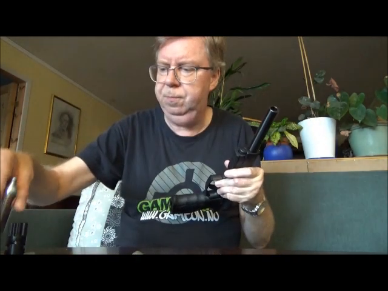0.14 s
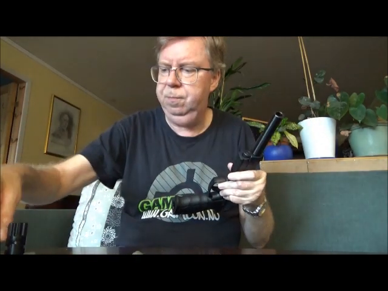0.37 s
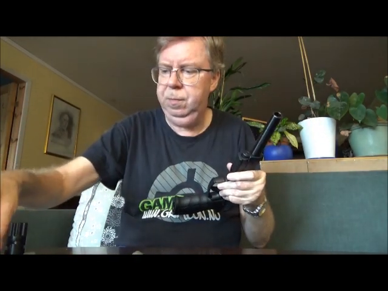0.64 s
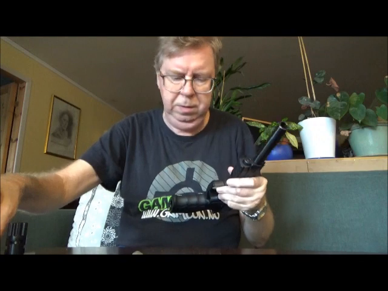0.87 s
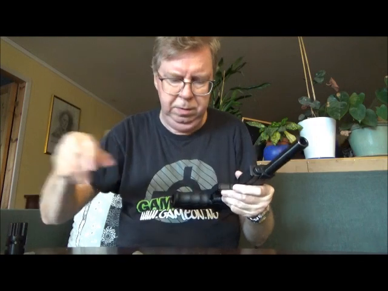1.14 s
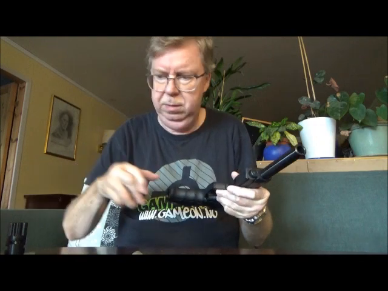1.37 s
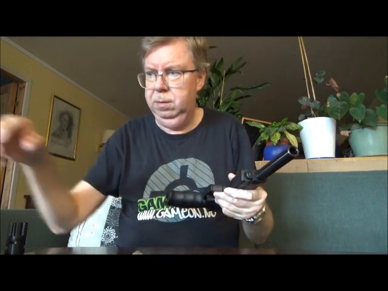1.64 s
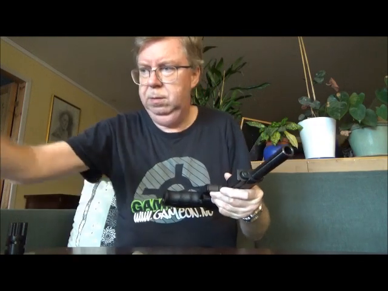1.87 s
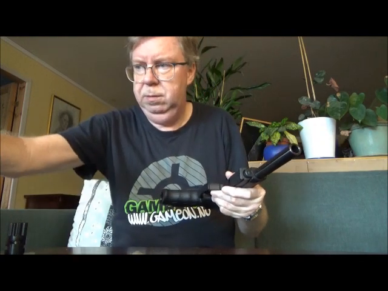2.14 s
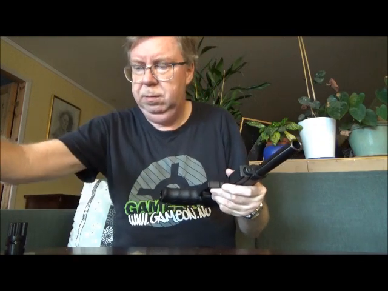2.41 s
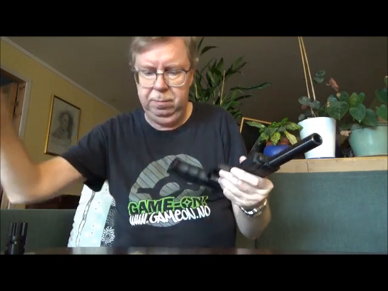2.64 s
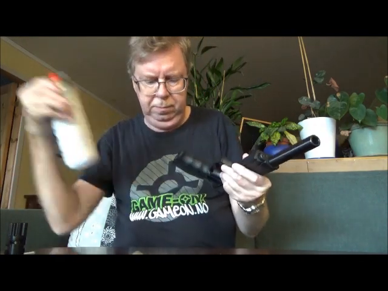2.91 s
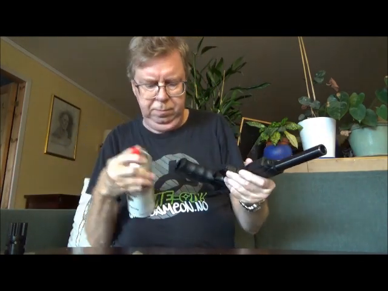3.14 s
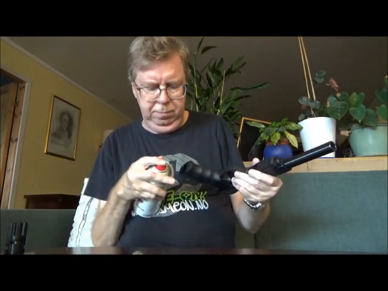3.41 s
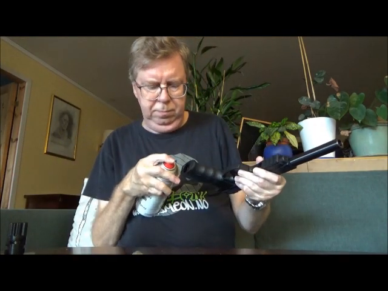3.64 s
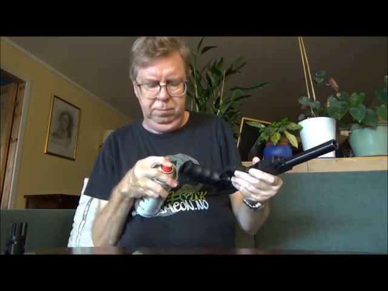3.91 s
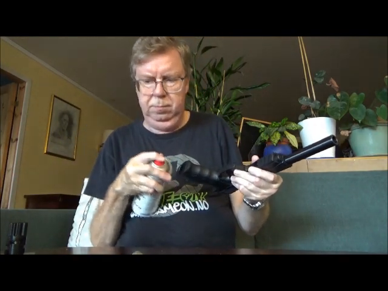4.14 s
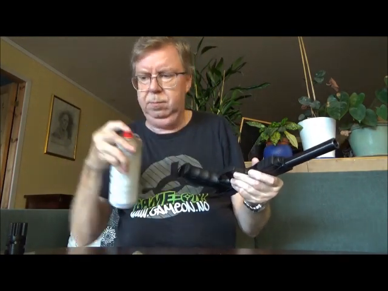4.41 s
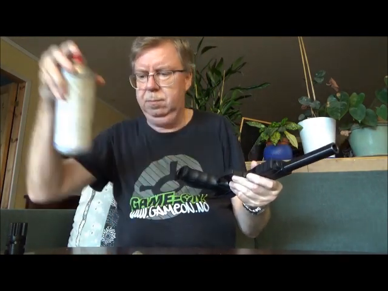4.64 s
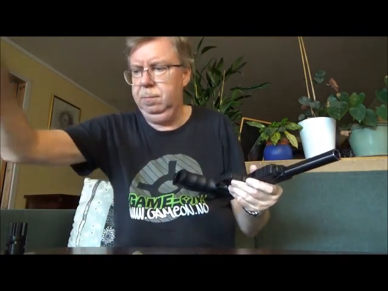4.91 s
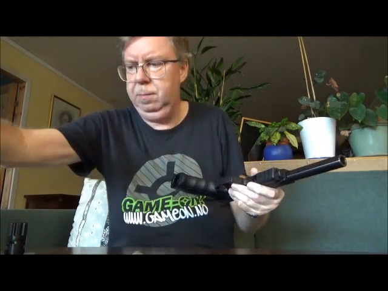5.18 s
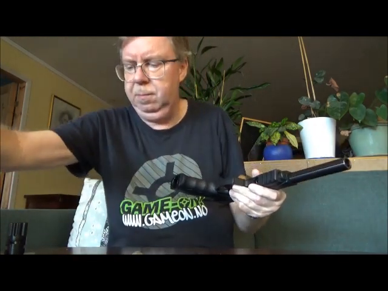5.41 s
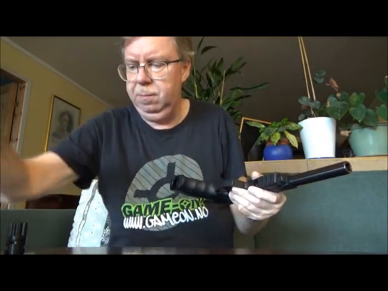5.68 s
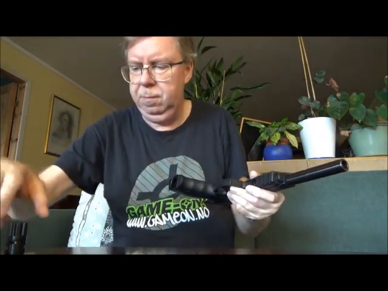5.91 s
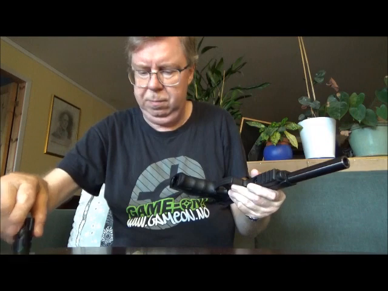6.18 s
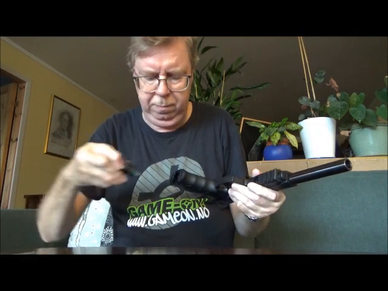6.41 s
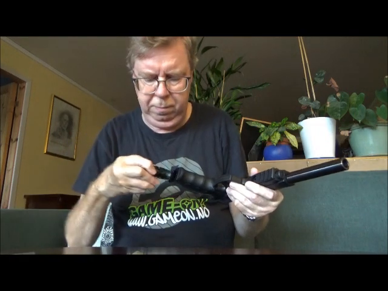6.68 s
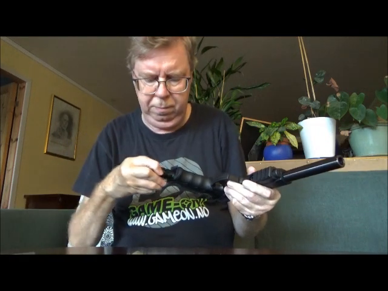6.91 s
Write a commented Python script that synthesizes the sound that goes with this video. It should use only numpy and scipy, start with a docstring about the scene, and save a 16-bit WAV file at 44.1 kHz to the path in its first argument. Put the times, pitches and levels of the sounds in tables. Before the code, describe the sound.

Close indoor handling sounds: hard metal knocks on wood, sloshing can, two brief hissing sprays with a hollow hum, a loud can thud, light clicks.

```python
"""Tool and spray can on a table

Indoors, close to a camera: a steel tool is laid on a wooden table and rattles; a spray can is lifted, shaken,
puffs twice into the hollow grip of an air pistol and is put back; small parts tick and scrape. Blows ring modes
of each body, the spray is shaped noise with a hum, and a room answers. The camera's gain control ducks ahead of
the loud knocks and creeps back, so its hiss sinks and returns."""
import sys
import numpy as np
from scipy import signal
from scipy.fft import rfft, irfft, next_fast_len
from scipy.io import wavfile
from scipy.ndimage import uniform_filter1d, minimum_filter1d, map_coordinates

SR = 44100
rng = np.random.default_rng(int(sys.argv[2]) if len(sys.argv) > 2 else 0)


def dump_mix(stems):
    """Bounce the given channels to the path in sys.argv[1] as a 16-bit WAV at rate SR."""
    frames = np.atleast_2d(stems).T  # one column per channel
    limited = np.clip(frames, -1, 1)  # hard clip at full scale
    pcm = np.round(limited * 32767).astype(np.int16)
    wavfile.write(sys.argv[1], SR, pcm)


def how_loud(loudness_db):
    """Turn decibels into a plain amplitude multiplier (0 dB gives 1, 20 dB gives 10)."""
    steps = np.asarray(loudness_db, float) / 20
    return 10 ** steps


N = 310905
TIME_S = np.arange(N) / SR


def unit(x):
    """x at rms 1."""
    return x / np.sqrt(np.mean(x ** 2) + 1e-20)


def along(points, hz):
    """(Hz, value) points read on a log frequency axis."""
    f, v = np.transpose(points)
    return np.interp(np.log(hz + 1), np.log(f + 1), v)


def wobble(knots_per_s):
    """A smooth random curve."""
    knots = rng.standard_normal(int(N * knots_per_s / SR) + 4)
    return map_coordinates(knots, [np.arange(N) * knots_per_s / SR])


def filtered(x, response):
    """x times a response of frequency."""
    m = next_fast_len(x.shape[-1] + 8192)
    spectrum = rfft(x, m) * response(np.fft.rfftfreq(m, 1 / SR))
    return irfft(spectrum, m)[..., :x.shape[-1]]


def stereo(pair, alike, left):
    """Two unrelated signals mixed to a left-right likeness and balance by frequency."""
    def mid_side(hz):
        turn = np.arccos(np.clip(along(alike, hz), -1, 1)) / 2
        return np.array([np.cos(turn), np.sin(turn)])

    mid, side = filtered(pair, mid_side)
    both = np.array([mid + side, mid - side])
    return filtered(both, lambda hz: how_loud(np.outer([.5, -.5], along(left, hz))))


def noise(spectrum, channels=1):
    """Coloured noise of rms 1."""
    white = rng.standard_normal((channels, N))
    return unit(filtered(white, lambda hz: how_loud(along(spectrum, hz))))


def add(out, start_s, sound):
    """Mix a short sound in at start_s."""
    part = out[:, round(start_s * SR):][:, :sound.shape[-1]]
    part += sound[..., :part.shape[-1]]


# room and camera floor, relative: pitch_hz, density_db_per_hz
HISS_SPECTRUM = [(12, -15), (20, -6.5), (55, -6), (146, -5), (198, -4.5), (293, -3.5), (399, -5.5),
                 (527, -6), (1190, -8.5), (1290, -8.5), (1480, -10.5), (1760, -10), (3440, -14.5),
                 (16000, -24)]
# diffuse sound: pitch_hz, left_right_likeness
DIFFUSE_LIKENESS = [(60, .93), (180, 0.82), (550, .22), (1650, .23), (5000, .58), (15000, 1)]
# sources in front: pitch_hz, left_minus_right_db
AHEAD_BALANCE = [(100, -0.2), (5000, 0.2)]


def hiss():
    """Diffuse coloured noise with a slow, slight waver."""
    floor = stereo(noise(HISS_SPECTRUM, channels=2), DIFFUSE_LIKENESS, AHEAD_BALANCE)
    return how_loud(-57.5) * unit(floor * how_loud(0.19 * wobble(0.58)))


# hollow or steel parts left ringing: start_s, level_db (before rise and waver), pitch_hz, t60_s
PINGS = [(0.068, -45, 824, 0.33), (0.866, -29, 9000, .14), (0.866, -37, 8590, 0.57),
         (2.03, -58, 1000, 0.27), (2.16, -60, 6370, .5), (2.16, -62, 5750, 0.45), (2.21, -62, 3650, .3),
         (2.2, -41.5, 1095, 0.064), (2.915, -54.5, 1500, 0.17), (3.761, -42.5, 550, 0.016),
         (3.871, -36, 590, 0.015), (4.392, -53.5, 1530, 0.41), (4.385, -54, 418, 0.18),
         (4.492, -35.5, 1545, 0.062), (4.495, -49, 829, 0.19), (4.499, -53.5, 1346, 0.35),
         (4.5, -47, 1786, .15), (4.55, -56, 3320, .08), (4.555, -50.5, 844, 0.21),
         (5.628, -35.5, 1500, 0.46), (5.63, -32, 1050, 0.46), (5.85, -55, 1500, .4)]
PING_RISE, PING_WAVER_DB = .04, 2.1  # rise as a share of t60; random waver in the ring's level


def pings():
    """Light touches of metal and plastic: one resonance each, slightly rough in phase."""
    out, t = np.zeros((2, N)), np.arange(SR // 2) / SR
    for start_s, peak_db, pitch_hz, t60_s in PINGS:
        drift_rad = np.cumsum(rng.normal(0, .025, len(t)))
        level_db = peak_db - 60 * t / t60_s + PING_WAVER_DB * wobble(49)[:len(t)]
        rise = 1 - np.exp(-t / (PING_RISE * t60_s))
        add(out, start_s, how_loud(level_db) * rise * np.sin(2 * np.pi * pitch_hz * t + drift_rad))
    return out


# decay of the room: pitch_hz, t60_s
ROOM_DECAY = [(100, 0.32), (500, 0.36), (2000, 0.35), (10000, 0.33)]


def room(x, left, step):
    """Each frequency of the room's answer dies at its own speed; every step of samples hears a new tail."""
    out = np.zeros((2, N))
    for start in range(0, N, step):
        piece = x[None, start:start + step]
        if np.abs(piece).max() < 1e-4:
            continue
        hz, t, z = signal.stft(rng.standard_normal((2, SR // 2)), SR, nperseg=256)
        decay = how_loud(-60 * t / along(ROOM_DECAY, hz)[:, None])
        pair = signal.istft(z * decay, SR, nperseg=256)[1]
        tail = stereo(pair, DIFFUSE_LIKENESS, left)
        tail *= 1 - np.exp(-np.arange(tail.shape[1]) / SR / 0.004)  # the walls answer after a few ms
        tail /= np.linalg.norm(tail.mean(0))
        add(out, start / SR, signal.fftconvolve(piece, tail, axes=1))
    return out


# ticks of small parts and one short scrape (the row at 0.834 s): start_s, peak_db, centre_hz, t60_s
TICKS_AND_SCRAPE = [(0.078, -48.5, 1570, 0.11), (0.515, -21, 7000, 0.022), (0.516, -24, 3200, .015),
                    (0.733, -27.5, 8500, 0.0096), (0.834, -36.5, 5500, 0.14), (2.152, -44, 2700, 0.027),
                    (2.18, -49.5, 1300, 0.16), (2.909, -39.5, 1170, 0.0065), (3.761, -51, 1500, 0.0072),
                    (3.871, -42, 3000, .012), (3.891, -39, 5500, 0.02), (3.949, -19.5, 5500, 0.07),
                    (4.394, -43.5, 2300, 0.056), (4.432, -42, 2318, 0.022), (4.449, -31.5, 7400, 0.0097),
                    (4.488, -38.5, 2150, 0.018), (4.552, -48.5, 2800, 0.022)]
BURST_OCTAVES = .75  # width of a burst's colour


def ticks_and_scrape():
    """Ticks of small parts and one short scrape, each a noise burst with a broad colour."""
    out, t = np.zeros((2, N)), np.arange(SR // 8) / SR
    for start_s, peak_db, centre_hz, t60_s in TICKS_AND_SCRAPE:
        def colour(hz):
            return np.exp(-(np.log2((hz + 1) / centre_hz) / BURST_OCTAVES) ** 2)

        grit = filtered(rng.standard_normal(len(t)), colour)
        burst = grit * how_loud(-60 * t / t60_s) * (1 - np.exp(-t / .0005))
        add(out, start_s, how_loud(peak_db) * burst / np.abs(burst).max())
    return out


# a wide board: pitch_hz, left_right_likeness
BROAD_LIKENESS = [(60, 1), (200, .9), (550, .82), (1700, .78), (5000, .82), (15000, 1)]
# the table side: pitch_hz, left_minus_right_db
LEFT_BALANCE = [(60, 1.2), (180, -0.5), (550, 4), (1650, 2.5), (5000, 2.5), (15000, .3)]
STRIKE, STRIKE_HZ = 6.03, 3000  # push against one sample of chatter; too slow for modes above STRIKE_HZ


def knocks(hits, modes, chatter_s, alike=BROAD_LIKENESS, left=LEFT_BALANCE):
    """Every contact is a push and a short chatter of force that rings the body's modes at new strengths.
    Two parts of the body radiate unrelated versions, which widens the image."""
    out, t = np.zeros((2, N)), np.arange(SR // 8) / SR
    hz, width_hz, mode_db = np.transpose(modes)[:, :, None]
    ring = (1 - np.exp(-1.2 * hz * t)) * np.exp(-np.pi * width_hz * t) * np.sin(2 * np.pi * hz * t)
    push = STRIKE * (-1) ** np.arange(len(hz)) / (1 + (hz[:, 0] / STRIKE_HZ) ** 2)
    for start_s, peak_db, *tilt_db in hits:
        tilt = np.clip(sum(tilt_db), -6, 6) * np.log2(hz / 1000)
        level_db = mode_db + tilt + rng.normal(0, 2, hz.shape)
        force = how_loud(-60 * t / chatter_s) * rng.standard_normal((2, len(hz), len(t)))
        force[0, :, 0] += push
        rung = signal.fftconvolve(force, ring[None], axes=2)
        shared = (rung[0] * rung[1]).sum(1, keepdims=True) / (rung[0] ** 2).sum(1, keepdims=True)
        rung[1] -= rung[0] * shared  # make the two versions unrelated
        rung *= how_loud(level_db) * np.sqrt(width_hz) / np.linalg.norm(rung, axis=2, keepdims=True)
        blow = stereo(rung.sum(1), alike, left)
        add(out, start_s, how_loud(peak_db) * blow / np.abs(blow.mean(0)).max())
    return out


RATTLE_GAP_S, RATTLE_TILT_DB_PER_OCTAVE = .007, -5.5  # means


def rattles(rows):
    """Small rebounds after a blow, at uneven gaps, fading through each rattle."""
    hits = []
    for start_s, length_s, peak_db, fade_db_per_s in rows:
        after_s = np.arange(0, length_s, RATTLE_GAP_S)
        luck = rng.standard_normal((len(after_s), 3))
        hit_s = start_s + after_s + .2 * RATTLE_GAP_S * luck[:, 0]
        hit_db = peak_db - fade_db_per_s * after_s + 1.5 * luck[:, 1]
        hits += zip(hit_s, hit_db, RATTLE_TILT_DB_PER_OCTAVE + 1.5 * luck[:, 2])
    return hits


# contacts: start_s, mid_peak_db, tilt_db_per_octave (held within 6 either way)
TOOL_HITS = [(0.4797, 3.5, -1.2), (0.4905, -9, -5.5), (0.4965, -9.5, -7.5), (0.752, -34.5, 1.7),
             (0.817, -36.5, -0.5), (0.8625, -27.5, 4.5), (0.8665, 6, 3), (0.8835, 0, -3.5),
             (0.8955, 1.5, 1.5), (0.902, -2, 1.1), (0.9165, 2, 0), (0.925, 7.5, 1.2), (0.9285, -1, -4.5),
             (0.9395, 5, -1.5)]
# rebounds: start_s, length_s, first_peak_db, fade_db_per_s
TOOL_RATTLES = [(.501, .02, -19, 361), (.871, .1, -8.5, 26)]
# modes of the tool on the table: pitch_hz, width_hz, level_db
TOOL_MODES = [(55, 40, -25.5), (100, 16, -18), (215, 40, -16), (295, 58, -11.5), (489, 210, -5.5),
              (700, 450, -3.5), (939, 240, 3.5), (1330, 530, 1), (1648, 350, 2), (1970, 380, 5.5),
              (2350, 400, -7), (3000, 580, -5.5), (3630, 1100, -17.5), (4424, 970, -15.5), (5500, 920, -22),
              (7100, 5300, -28), (9610, 4900, -36.5)]


def tool_knocks():
    """Steel on wood: broad modes under a very short chatter."""
    return knocks(TOOL_HITS + rattles(TOOL_RATTLES), TOOL_MODES, chatter_s=0.0081)


# parts dragged along: start_s, end_s, level_db
SLIDES = [(0.747, 0.9, -44), (6.866, 6.945, -55.5), (6.961, 7.025, -54)]
# scrape colour, relative: pitch_hz, density_db_per_hz
SCRAPE_SPECTRUM = [(59, -48), (100, -35.5), (205, 0.5), (271, -8), (736, -4.5), (3650, -21.5), (6790, -29),
                   (9000, -45.5), (11700, -73), (19800, -120)]
SLIDE_EDGE_S = 0.0086


def slides():
    """Parts scrape as they slide: low coloured noise, roughened."""
    drag = 0
    for start_s, end_s, level_db in SLIDES:
        edge_s = np.minimum(TIME_S - start_s, end_s - TIME_S)
        drag = drag + how_loud(level_db) * np.clip(edge_s / SLIDE_EDGE_S, 0, 1)
    return drag * how_loud(2.5 * wobble(300)) * noise(SCRAPE_SPECTRUM)[0]


# contacts: start_s, mid_peak_db, tilt_db_per_octave (held within 6 either way)
TABLE_HITS = [(2.159, -39, 8), (2.168, -38.5, -10), (2.200, -44, 5.5), (2.220, -47, 9.5),
              (2.315, -48.5, -11), (2.345, -39, -7.5), (2.360, -45.5, -1.2), (2.392, -50, 2.5),
              (6.143, -39, -17), (6.153, -35.5, -4), (6.161, -22, 3), (6.168, -15.5, 2), (6.178, -23, 1.3)]
# modes of the table: pitch_hz, width_hz, level_db
TABLE_MODES = [(106, 13, 7), (149, 26, -3), (231.6, 15.7, 9.5), (259, 15, -0.5), (303, 88, 8),
               (474, 155, -2), (680, 99, 3), (783, 540, -9.5), (1156, 96, -22.5), (1390, 240, -12.5),
               (1600, 190, -16), (1990, 110, -17.5), (3200, 1200, -35)]


def table_knocks():
    """Wood alone: mostly low modes, longer chatter."""
    return knocks(TABLE_HITS, TABLE_MODES, chatter_s=0.036)


# the hand shifts on the can: middle_s, half_length_s, level_db
STROKES = [(2.784, 0.072, -69), (2.894, 0.05, -66.5), (3.1, 0.39, -66), (3.31, 0.042, -51.5),
           (3.4, 0.048, -61.5), (3.48, 0.027, -59.5), (4.38, 0.053, -58), (4.953, 0.15, -64.5)]
# rustle colour, relative: pitch_hz, density_db_per_hz
RUSTLE_SPECTRUM = [(880, -81), (1500, -3), (2360, -23), (3090, -1.5), (5300, -4.5), (5780, 0), (7420, -7.5),
                   (10000, -0.5), (15000, -34)]


def strokes():
    """Skin and cloth rustle on the can: bright noise in bell-shaped swells."""
    rub = 0
    for middle_s, half_s, level_db in STROKES:
        rub = rub + how_loud(level_db) * np.exp(-((TIME_S - middle_s) / half_s) ** 2)
    return rub * how_loud(2.2 * wobble(48)) * noise(RUSTLE_SPECTRUM)[0]


# liquid thumps in the shaken can: start_s, mid_peak_db
SHAKES = [(2.885, -44.5), (3.036, -30), (3.203, -26.5), (3.365, -25.5)]
# modes of the filled can: pitch_hz, width_hz, level_db
SLOSH_MODES = [(100, 19, 1.5), (170, 69, -3), (212, 52, 3), (254, 36, 0.5), (321, 47, -0.5), (482, 80, 1),
               (677, 120, -9.5), (988, 60, -10), (1420, 270, -27), (2080, 460, -30.5)]


def shaken_can():
    """Liquid thumps ring the low modes of the filled can."""
    return knocks(SHAKES, SLOSH_MODES, chatter_s=0.027, left=AHEAD_BALANCE)


# presses of the button: valve_cracks_s, wide_open_s, lets_go_s, full_flow_db, cracked_flow_db
PUFFS = [(3.901, 3.945, 4.003, -34, -38), (4.077, 4.096, 4.1953, -28, -40)]
# jet colour, relative: pitch_hz, density_db_per_hz
JET_SPECTRUM = [(180, -28), (300, -26), (593, -22.5), (667, -19.5), (762, -10), (930, -6.5), (1810, -10),
                (2400, -14.5), (3240, -8.5), (5250, -10.5), (9710, -14), (16000, -25)]
# the spray cloud: pitch_hz, left_right_likeness
PLUME_LIKENESS = [(300, 0.9), (3000, 1), (9000, 0.95), (12000, 1)]
# the grip's hum: time_s, pitch_hz
HOLLOW_PITCH = [(3.9, 852), (3.97, 807), (4.1, 794.6), (4.2, 700), (4.25, 750)]
CRACK_SHARE, OPEN_S, SHUT_DB_PER_S = .33, 0.015, 905  # share of the cracked stage spent rising
THIN_DB, THIN_HZ = -1, 6030  # the narrow valve gap adds a high hiss, against the cracked flow
HOLLOW_DB, HUM_GROWS = -11, 2.1  # hum against the flow; it swings wider than the flow
HOLLOW_LAG_S, LINGER_DB, LINGER_S = 0.0041, -18, 0.039  # the hum builds fast and a part lingers


def spray():
    """A spitting jet in two valve stages; the hollow grip hums at a pitch that sinks as the nozzle goes in,
    then rises a little."""
    flow, gap, blowing = np.zeros((3, N))
    for cracks_s, opens_s, shuts_s, full_db, cracked_db in PUFFS:
        rise = np.clip((TIME_S - cracks_s) / (CRACK_SHARE * (opens_s - cracks_s)), 0, 1)
        on = rise * how_loud(-SHUT_DB_PER_S * np.maximum(TIME_S - shuts_s, 0))
        under_db = np.interp(TIME_S, [opens_s, opens_s + OPEN_S], [cracked_db - full_db, 0])
        flow += on * how_loud(full_db + under_db)
        blowing += on * how_loud(full_db + HUM_GROWS * under_db)
        gap += on * how_loud(cracked_db + THIN_DB)
    spit = how_loud(2.2 * wobble(700) + .8 * wobble(60))  # droplets make the flow spiky
    jet = unit(stereo(noise(JET_SPECTRUM, channels=2), PLUME_LIKENESS, AHEAD_BALANCE) * spit)
    thin = unit(filtered(noise(JET_SPECTRUM)[0], lambda hz: hz ** 2 / (hz ** 2 + THIN_HZ ** 2)))
    hum_s, hum_hz = np.transpose(HOLLOW_PITCH)
    phase = 2 * np.pi * np.cumsum(np.interp(TIME_S, hum_s, hum_hz)) / SR
    cavity = unit(wobble(170) * np.sin(phase))

    def lag(hz, s):
        return 1 / (1 + 2j * np.pi * hz * s)

    filling = filtered(blowing, lambda hz: lag(hz, HOLLOW_LAG_S) + how_loud(LINGER_DB) * lag(hz, LINGER_S))
    return flow * jet + gap * thin + how_loud(HOLLOW_DB) * filling * cavity


# contacts: start_s, mid_peak_db, tilt_db_per_octave
CAN_HITS = [(5.5028, 8, -0.4), (5.513, 3.7, 1), (5.521, 1.5, -1.7), (5.527, 1, 0.6), (5.628, -0.8, -2.5),
            (5.633, -8, -4)]
# rebounds: start_s, length_s, first_peak_db, fade_db_per_s
CAN_RATTLES = [(5.533, .04, -8.5, 201), (5.641, .012, -11.5, 400)]
# modes of the can on the table: pitch_hz, width_hz, level_db
CAN_MODES = [(45.6, 49, -21), (94.5, 30, -10.5), (233, 39.3, 2), (359.7, 81, 6.5), (460, 148, 0.5),
             (637, 110, 8), (1000, 600, 5), (1500, 760, -0.5), (2003, 740, -9), (2500, 160, -20.5),
             (2896, 810, -13), (3900, 1100, -21), (4900, 800, -28), (5800, 3400, -29), (9000, 3600, -37)]


def can_knocks():
    """The can put back: its modes under a short chatter."""
    return knocks(CAN_HITS + rattles(CAN_RATTLES), CAN_MODES, chatter_s=0.02)


# the end cap meets the grip: start_s, mid_peak_db
CAP_CLICKS = [(6.878, -25), (6.996, -41), (7.0335, -23)]
# modes of the cap: pitch_hz, width_hz, level_db
CAP_MODES = [(645, 66, 13.5), (1130, 315, -0.5), (1500, 500, 6), (1963, 750, 0), (2700, 650, -12.5),
             (3440, 350, -10), (5040, 2000, -12.5), (9200, 6100, -18)]
# a small thing: pitch_hz, left_right_likeness
NARROW_LIKENESS = [(60, .97), (15000, .97)]


def cap_clicks():
    """The end cap clicks against the grip: nearly mono."""
    return knocks(CAP_CLICKS, CAP_MODES, chatter_s=0.0114, alike=NARROW_LIKENESS, left=AHEAD_BALANCE)


def scene():
    """Things on the table stand left of the camera, the hands are in front."""
    table = tool_knocks() + table_knocks() + can_knocks()
    hands = pings() + ticks_and_scrape() + slides() + strokes() + spray() + cap_clicks()
    shaken = shaken_can()
    sound = table + hands + shaken
    sound += room(how_loud(-7.5) * table.mean(0), LEFT_BALANCE, SR // 80)
    # the shaken can is held out at arm's length, so wetter
    sound += room(how_loud(-12.5) * hands.mean(0) + how_loud(-8.5) * shaken.mean(0), AHEAD_BALANCE, SR // 3)
    heard = filtered(sound, lambda hz: (1j * hz / (1j * hz + 90)) ** 2)  # the microphone drops the deep bass
    return heard + hiss()


def gain_control(dry):
    """Looks ahead, cuts what passes a threshold, holds, then recovers at a slow steady rate."""
    threshold_db, cut_db_per_db, recovery_db_per_s = -16.5, .55, 2.23
    ahead, hold = round(.024 * SR), round(.45 * SR)
    level_db = 10 * np.log10(np.abs(uniform_filter1d((dry ** 2).mean(0), size=441)) + 1e-12)
    need_db = -cut_db_per_db * np.maximum(level_db - threshold_db, 0)
    padded_db = np.pad(need_db, (hold, ahead))
    held_db = minimum_filter1d(padded_db, size=(hold + ahead) | 1)[(hold + ahead) // 2:][:N]
    climb_db = recovery_db_per_s * TIME_S
    gain_db = np.minimum.accumulate(held_db - climb_db) + climb_db
    return dry * how_loud(uniform_filter1d(gain_db, size=221))


def limiter(x):
    """A fast limiter flattens the tallest peaks."""
    room_left = np.minimum(1, 0.5 / (np.abs(x).max(0) + 1e-9))
    return x * uniform_filter1d(minimum_filter1d(room_left, size=133), size=67)


def top_cut(x):
    """Nothing passes above the cut-off."""
    return signal.sosfilt(signal.butter(12, 15850, fs=SR, output="sos"), x)


def record(dry):
    """Gain control, then the limiter."""
    mix = limiter(gain_control(dry))
    return top_cut(mix)


dry = scene()
out = record(dry)
dump_mix(out)
```